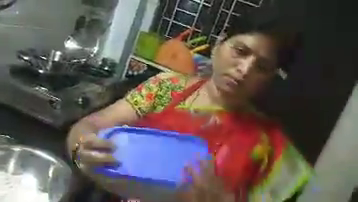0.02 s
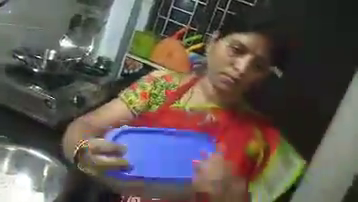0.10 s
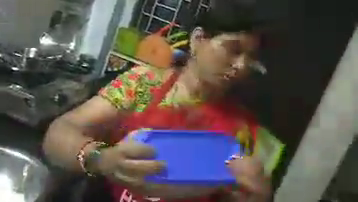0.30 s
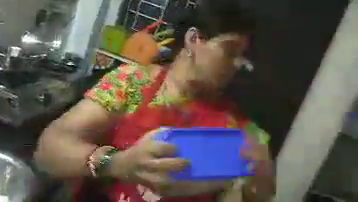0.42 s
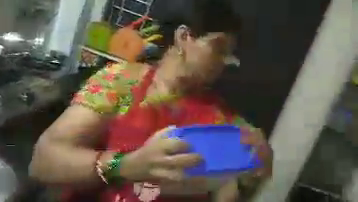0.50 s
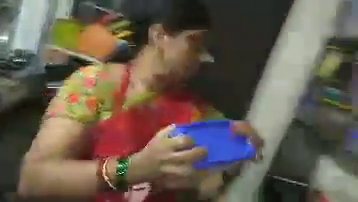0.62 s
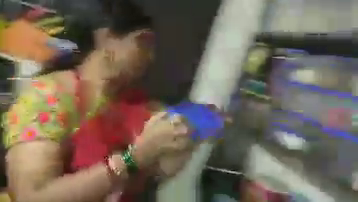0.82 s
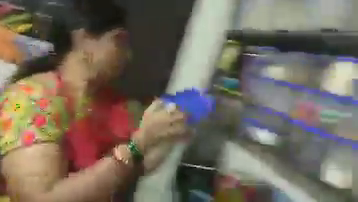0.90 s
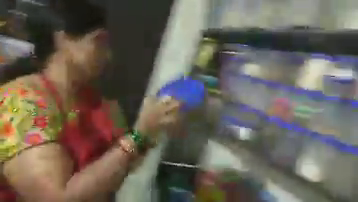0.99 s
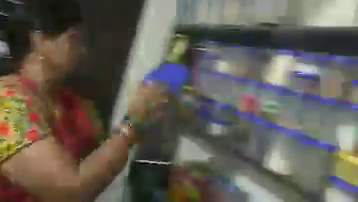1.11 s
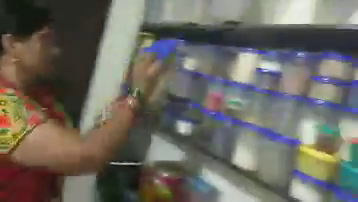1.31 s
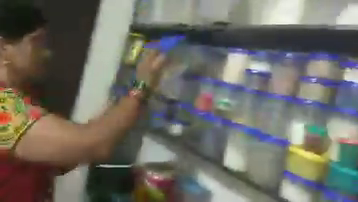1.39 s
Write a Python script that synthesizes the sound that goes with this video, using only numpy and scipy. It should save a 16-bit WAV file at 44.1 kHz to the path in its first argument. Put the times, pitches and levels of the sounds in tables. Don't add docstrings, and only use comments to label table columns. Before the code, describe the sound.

Plastic lid snapping on a box, close in a hard-walled kitchen with low steady hum. A light tap at 0.12 s, then a loud dry crack at 0.21 and another at 0.63, each a rapid slipping clatter with hollow body and room tail. Cloth rustles from 0.97, a barely heard far footfall at 1.05, bright glass bangles slide at 1.22 with a finger scuff, then faint tinkles to 1.5.

```python
import sys
import numpy as np
from scipy import signal
from scipy.io import wavfile
from scipy.ndimage import uniform_filter1d

SR = 44100
rng = np.random.default_rng(int(sys.argv[2]) if len(sys.argv) > 2 else 0)


def materialize(psi):
    bounded = np.clip(np.atleast_2d(psi).T, -1, 1)
    quanta = np.round(bounded * 32767).astype(np.int16)
    wavfile.write(sys.argv[1], SR, quanta)


def boost_factor(decibels):
    exponent = np.asarray(decibels, float) / 20
    return 10 ** exponent


N = 66150

# pitch_hz, level_db (per Hz)
HUM_TONE = [(15, -69), (25, -19), (389, 2), (482, -5), (1240, -7.5), (2010, -9), (2770, -8), (4260, -18.5),
            (15500, -53)]
CLOTH_TONE = [(1500, -3), (2300, -2.5), (5000, -8), (8000, -6.5), (10000, -14.5), (12000, -14.5),
              (15500, -16)]
# time_s, level_db
ARM_SWING = [
    (0, -72),
    (.55, -70.5),
    (.8, -71),
    (.97, -57.5),
    (1.05, -63.5),
    (1.18, -57),
    (1.35, -61.5),
    (1.45, -62),
    (1.5, -67),
]

# start_s, crack_level_db, ringing_level_db
TOUCH_CONTACTS = [
    (.1015, -46, -6),
    (.1200, -25.5, 5),
    (.1250, -51, -7),
]
FIRST_CONTACTS = [
    (.2060, -1.5, 4),
    (.2068, -0.5, -13),
    (.2080, -10, 9.5),
    (.2095, -12, 6),
    (.2111, -8, 3.5),
    (.2140, -5, -12),
]
SECOND_CONTACTS = [
    (.6252, 0.5, -1),
    (.6265, -16, 6),
    (.6298, -15, 12),
    (.6316, -8, 8),
    (.6333, -13.5, -5),
    (.6362, -10.5, 6),
    (.6375, -22, -9),
]
# pitch_hz, level_db
TOUCH_COLOUR = [(47, -22), (80, -2), (526, -6), (1040, -17), (1320, -15), (2600, -16.5), (7950, -26.5),
                (15000, -55)]
FIRST_COLOUR = [(100, -9), (270, 2.5), (550, -6), (1200, -5), (2500, -2.5), (5500, -5), (9000, -21),
                (15000, -30)]
SECOND_COLOUR = [(100, -17), (320, 0.5), (440, -1.5), (560, -11), (1400, -14.5), (2300, -5), (5000, -10),
                 (15000, -27)]
# pitch_hz, level_db, t60_s
TOUCH_BOX_MODES = [(2370, -24, 0.023)]
FIRST_BOX_MODES = [(960, -19.5, .015), (1940, -8.5, 0.025), (2433, 5, 0.0065), (4570, -35, 0.011),
                   (5310, -1.5, 0.03)]
SECOND_BOX_MODES = [(777, -12, .04), (1125, -17.5, 0.055), (2110, -5, 0.013), (3170, -25, .012),
                    (4970, -4, 0.008)]
# pitch_hz, level_db, t60_s
TOUCH_AIR = [(130, -13, 0.052), (294, -15, 0.044)]
FIRST_AIR = [(109, -20.5, 0.049), (270, -10.5, 0.031)]
SECOND_AIR = [(122, -24.5, 0.047), (283, -21, 0.073), (319.2, -23, 0.3), (370.7, -23.5, 0.33),
              (429.4, -20, 0.17)]
EDGE_TICK_DB = [-13, -16, -4.5]
ROOM_SHARE_DB = [1, 5.5, 6.5]
NEAR_WALLS_DB = [3, -3.5, -6.5]
# pitch_hz, t60_s
ROOM_DECAY = [(60, 0.58), (200, 0.41), (500, 0.43), (1500, 0.4), (4000, 0.41), (8000, 0.34), (15000, 0.24)]

# start_s, pitch_hz, level_db, t60_s
FOOTFALL = (1.055, 85, -50, .06)
# start_s, rise_s, t60_s, level_db
BANGLE_SLIDES = [
    (1.219, .017, .12, -29),
    (1.364, .006, .06, -45),
    (1.481, .006, .06, -50),
]
# start_s, rise_s, t60_s, level_db
FINGER_SCUFF = [
    (1.228, .035, .16, -45),
]
# pitch_hz, level_db
GLASS_COLOUR = [(500, -36), (2000, -26), (6000, -15), (8300, -6), (11500, -12), (12300, -11), (13100, -2),
                (15600, 0)]
SCUFF_COLOUR = [(1500, -23), (3500, -5), (5000, -5.5), (7000, -2.5), (11000, -8.5)]
# pitch_hz, level_db, t60_s
BANGLE_MODES = [(6560, -10, .02), (8500, -3, 0.048), (8040, -5, 0.026), (8520, -1, 0.093),
                (9250, 10, 0.017), (12800, -16, 0.02), (14200, -11, 0.022), (14400, -10, .02),
                (14100, -11, .015)]
# start_s, pitch_hz, level_db, t60_s
LONE_CLINKS = [(.118, 13700, -68, .08), (1.098, 7500, -43, .003), (1.1025, 8800, -38, .002),
               (1.2372, 2500, -27, .0015), (1.372, 6100, -58, .03), (1.4215, 8620, -59, .3),
               (1.4225, 8470, -61, .25), (1.4215, 8250, -56, .04), (1.4215, 13350, -55, .05),
               (1.4225, 13500, -59, .08), (1.488, 8400, -55, .06), (1.484, 14800, -53, .04),
               (1.4825, 12500, -48, .002)]


def evened(x):
    return x / np.sqrt(np.mean(x ** 2) + 1e-20)


def read(points, hz):
    f, value = np.transpose(points)
    return np.interp(np.log(hz + 1), np.log(f + 1), value)


def through(x, h):
    return signal.fftconvolve(x, h)[:N]


def hiss(tone, patchy_db):
    frames, hz = N // 256 + 5, np.fft.rfftfreq(1024, 1 / SR)
    a, b, patches = rng.standard_normal((frames, 513, 3)).T
    patches = uniform_filter1d(patches, size=16, axis=0)
    patches = evened(uniform_filter1d(patches, size=8, axis=1))
    level_db = read(tone, hz)[:, None] + patchy_db * patches
    noise = signal.istft((a + 1j * b) * boost_factor(level_db), nperseg=1024, noverlap=768)[1]
    return evened(noise[:N])


def room_hum():
    return boost_factor(-57.5) * hiss(HUM_TONE, patchy_db=1.2)


def cloth_rustle():
    swing_db = np.interp(np.arange(N) / SR, *np.transpose(ARM_SWING))
    return boost_factor(swing_db) * hiss([(800, -34)] + CLOTH_TONE, patchy_db=3.1)


def colour(tone):
    db = read(tone, abs(np.fft.fftfreq(4096, 1 / SR)))
    spectrum = np.exp(np.conj(signal.hilbert(np.log(boost_factor(db)))))
    h = np.fft.ifft(spectrum).real[:2048]
    return h / np.linalg.norm(h)


def ring(modes):
    t = np.arange(SR // 3) / SR
    sines = sum(boost_factor(db - 60 * t / t60) * np.sin(2 * np.pi * hz * t) for hz, db, t60 in modes)
    return (1 - np.exp(-t * 8000)) * sines


def clicks(times, dbs):
    x = np.zeros(N)
    np.add.at(x, np.round(np.array(times) * SR).astype(int), boost_factor(np.array(dbs)))
    return x


def kitchen(x, early_db):
    late_db, late_stretch, build_s, early_t60_s = -28, 4.06, 0.0025, 0.25
    hz, t, z = signal.stft(rng.standard_normal(SR), SR, nperseg=512)
    fall_db = -60 * t / np.maximum(read(ROOM_DECAY, hz), .05)[:, None]
    decay = boost_factor(fall_db) + boost_factor(late_db + fall_db / late_stretch)
    tail = signal.istft(z * decay, SR, nperseg=512)[1]
    s = np.arange(len(tail)) / SR
    build = np.minimum(s / build_s, 1) ** 2
    tail = tail * build * (1 + boost_factor(early_db - 60 * s / early_t60_s))
    return through(x, tail / np.linalg.norm(tail))


def splintered(times, crack_db, main):
    splinter_db, splinter_t60_s = -7, 0.0057
    t = np.arange(400) / SR
    grit = boost_factor(splinter_db - 60 * t / splinter_t60_s) * rng.standard_normal((len(times), len(t)))
    grit[main] *= .4
    grit = grit + (t == 0)
    return sum(through(clicks([s], [db]), g) for s, db, g in zip(times, crack_db, grit))


def snap(contacts, tone, box, air, order, main):
    times, crack_db, ring_db = np.transpose(contacts)
    crack = colour(tone)
    hit = clicks(times[main:main + 1], crack_db[main:main + 1])
    box_ring = through(clicks(times, crack_db + ring_db), 0.23 * ring(box))
    body = box_ring + through(hit, ring(air))
    cracks = through(splintered(times, crack_db, main), 1.24 * crack)
    direct = cracks + body + boost_factor(EDGE_TICK_DB[order]) * hit
    into_room = 2.28 * through(hit, crack) + 0.054 * body
    return direct + boost_factor(ROOM_SHARE_DB[order]) * kitchen(into_room, NEAR_WALLS_DB[order])


def lid():
    x = snap(TOUCH_CONTACTS, TOUCH_COLOUR, TOUCH_BOX_MODES, TOUCH_AIR, order=0, main=1)
    x = x + snap(FIRST_CONTACTS, FIRST_COLOUR, FIRST_BOX_MODES, FIRST_AIR, order=1, main=0)
    x = x + snap(SECOND_CONTACTS, SECOND_COLOUR, SECOND_BOX_MODES, SECOND_AIR, order=2, main=0)
    bass_cut_hz = 116
    return signal.sosfiltfilt(signal.butter(2, bass_cut_hz, "high", fs=SR, output="sos"), x)


def footfall():
    return through(clicks(FOOTFALL[:1], [0]), ring([FOOTFALL[1:]]))


def stroke(start, rise, t60, db):
    t = np.arange(N) / SR - start
    return np.clip(t / rise, 0, 1) * boost_factor(db - 60 * np.maximum(t - rise, 0) / t60)


def bangle_slides():
    clinks_per_s, spread_db, slide_db, ring_db = 7200, 4.5, 4.5, -15
    struck = rng.random(N) < clinks_per_s / SR
    strength = boost_factor(spread_db * np.minimum(rng.exponential(1, N), 4))
    hits = evened(struck * rng.choice([-1., 1.], N) * strength)
    hits = boost_factor(slide_db) * hits * sum(stroke(*row) for row in BANGLE_SLIDES)
    bell = ring(BANGLE_MODES)
    ringing = through(hits, bell / np.linalg.norm(bell))
    return through(hits, colour(GLASS_COLOUR)) + boost_factor(ring_db) * ringing


def finger_scuff():
    scuff_db = 3.5
    noise = rng.standard_normal(N) * boost_factor(scuff_db) * stroke(*FINGER_SCUFF[0])
    return through(noise, colour(SCUFF_COLOUR))


def lone_clinks():
    return sum(through(clicks([s], [0]), ring([mode])) for s, *mode in LONE_CLINKS)


def bangles():
    room_db, lone_room_db = -1, -6.5
    rubbed = bangle_slides() + finger_scuff()
    lone = lone_clinks()
    room = kitchen(rubbed + boost_factor(lone_room_db) * lone, early_db=-2)
    return rubbed + lone + boost_factor(room_db) * room


def scene():
    return (room_hum() + cloth_rustle() + lid() + footfall() + bangles())[None]


def low_pass(x):
    return signal.sosfilt(signal.butter(12, 16830, fs=SR, output="sos"), x)


def record(dry):
    port_hz, port_q, port_gain = 8200, 6.7, 0.45
    self_noise_db, knee, edge_hz = -80.5, 1.54, 15650
    x = dry + port_gain * signal.lfilter(*signal.iirpeak(port_hz, port_q, fs=SR), dry)
    x = x + boost_factor(self_noise_db) * rng.standard_normal(x.shape)
    x = knee * np.tanh(x / knee)
    band_limit = signal.firwin(511, edge_hz, window=("kaiser", 7), fs=SR)
    mix = signal.oaconvolve(x, band_limit[None], "same")
    return low_pass(mix)


dry = scene()
out = record(dry)
materialize(out)
```